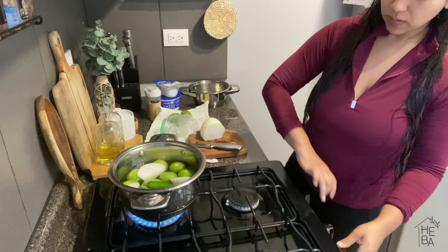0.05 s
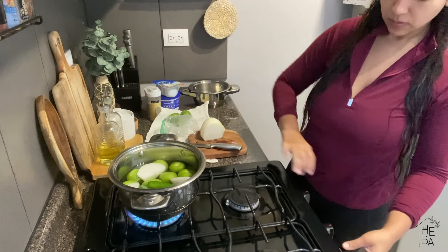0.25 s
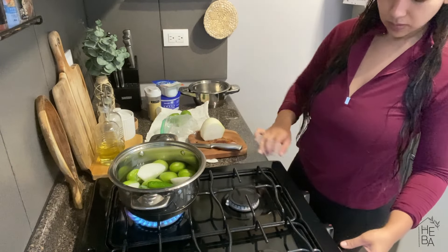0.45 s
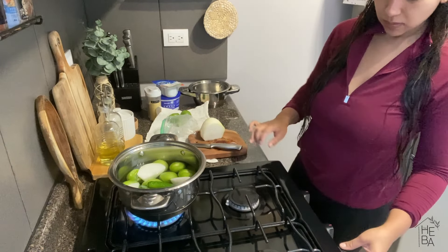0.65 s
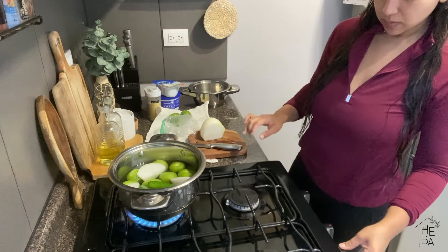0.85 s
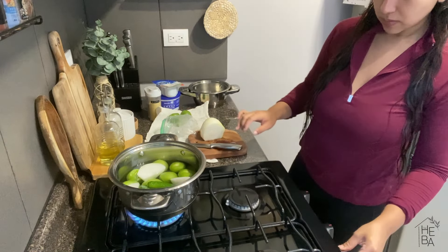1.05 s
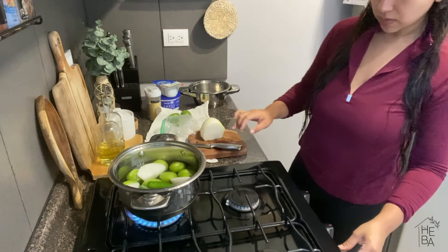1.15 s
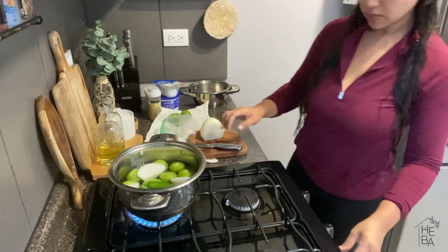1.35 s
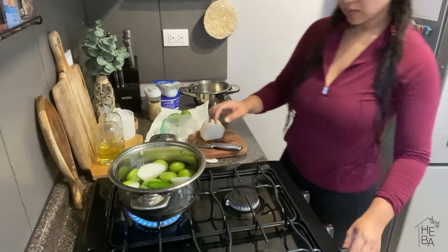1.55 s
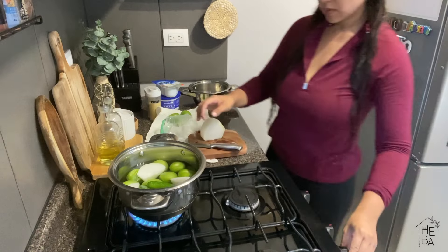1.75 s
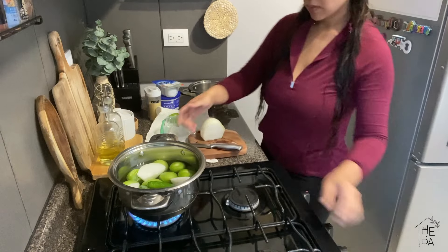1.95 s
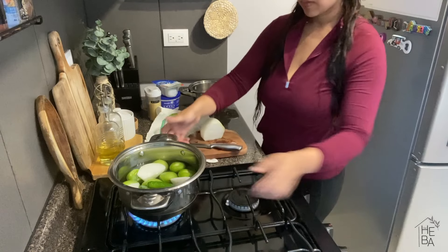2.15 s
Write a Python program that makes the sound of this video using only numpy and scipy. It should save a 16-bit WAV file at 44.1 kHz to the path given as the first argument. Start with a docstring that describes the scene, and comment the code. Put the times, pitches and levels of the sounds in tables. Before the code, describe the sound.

Beside a softly rumbling lit burner, gas hisses, a spark snaps and flame bursts out with a boom and metallic stove ring, fades quickly, then a light knock and dull movement, heard nearby in a reverberant kitchen.

```python
"""Beside a rumbling, already lit burner, gas hisses out (filtered noise) in a small hard-walled kitchen.
A spark snaps, clicks begin (short noise bursts) and the gas catches: a pop, then decaying room and hob modes.
The flame roars and rushes (resonant and fluttering noise), with hob hum and scuffs, then hoots (a sine
and its octave) and settles. Last, a light hob knock (decaying modes), then the cook steps away with
dull shuffling and a rustle of clothes (shaped noise)."""
import sys
import numpy as np
from scipy import signal
from scipy.fft import rfft, irfft, next_fast_len
from scipy.io import wavfile
from scipy.ndimage import uniform_filter1d, map_coordinates

SR = 44100
rng = np.random.default_rng(int(sys.argv[2]) if len(sys.argv) > 2 else 0)


def log_audio(samples):
    """Write samples as a 16-bit WAV file to the path given in sys.argv[1]."""
    # one column per channel
    frames = np.atleast_2d(samples).T
    # limit to full scale, then quantise
    limited = np.clip(frames, -1, 1)
    pcm = np.round(limited * 32767).astype(np.int16)
    wavfile.write(sys.argv[1], SR, pcm)


N = 97020

# stereo likeness of room noise: frequency_hz, left_right_correlation
LIKENESS = [(100, 0.96), (200, 0.76), (370, 0.2), (700, 0.24), (1300, 0.48), (2500, 0.23), (5500, 0.096),
            (8000, 1), (14000, 1)]
# stereo balance: frequency_hz, left_over_right_db
BALANCE = [(60, 2.5), (120, 4.5), (240, 6), (370, -1), (600, 2.5), (2000, 1.3), (9000, 0.5)]
# left channel's delay behind the right: frequency_hz, lag_s
LEFT_LAG = [(100, .00005), (400, .00015), (900, .0003), (5100, .000294), (10400, .00024)]
# colour of the kitchen's lingering answer: frequency_hz, gain_db
ECHO_COLOUR = [(200, -14), (700, -7.5), (1600, 2), (3000, -10), (6000, -33)]
# spectrum of the lit burner: frequency_hz, level_db
RUMBLE_SPECTRUM = [(27, -32), (41, -1), (50, -17.5), (80, -5), (120, -7), (146, -9.5), (180, -9.5),
                   (260, -11.5), (340, -20), (700, -32.5), (2500, -59.5), (8000, -62.5), (14000, -64)]
# low drone of the lit burner: time_s, level_db
DRONE_LEVEL = [(0, -33.5), (0.07, -51), (0.12, -51), (1.08, -45.5), (1.15, -33), (1.22, -43), (1.4, -36.5),
               (1.58, -46), (1.75, -39), (2.2, -35.5)]
# hob's main resonance: time_s, level_db
HUM_LEVEL = [(0.06, -64), (0.13, -44), (0.195, -40), (0.27, -27), (0.45, -31.5), (0.55, -42), (0.68, -33),
             (0.76, -40), (0.84, -66), (1.5, -64.5), (1.8, -47.5), (2.2, -46)]
# unlit gas: time_s, level_db
GAS_LEVEL = [(0, -49), (0.06, -53), (0.095, -39.5), (0.18, -37.5), (0.22, -64)]
# spectrum of the gas jet: frequency_hz, level_db
JET_SPECTRUM = [(150, -20), (280, -6.5), (700, -13.5), (1400, -15), (2600, -19), (5000, -32.5),
                (8300, -36.5), (14000, -57.5)]
# narrow-band scuffs and squeaks: start_s, level_db (before doubling), centre_hz, width_hz
SCUFFS = [(0.336, -32.5, 2520, 330), (1.39, -54, 1770, 120), (1.455, -53, 1720, 100),
          (1.517, -52, 1760, 120), (1.556, -52.5, 1640, 110), (1.606, -57, 1590, 110),
          (1.628, -49, 990, 150), (1.913, -34.5, 646, 300), (2.001, -47, 3260, 1200)]
# cook's movement: time_s, shuffle_db, cloth_db, swish_db
MOVES = [(1.19, -63.5, -96, -94), (1.23, -41, -57, -82), (1.33, -42.5, -66.5, -87), (1.42, -44, -60.5, -80),
         (1.59, -43.5, -59, -86.5), (1.66, -40, -58.5, -68), (1.715, -35.5, -49.5, -80.5),
         (1.76, -38.5, -54, -76.5), (1.81, -38, -52.5, -63), (1.895, -34, -47, -53.5),
         (1.95, -37.5, -54.5, -65), (2.0, -39.5, -57, -57.5), (2.07, -35, -44.5, -62.5),
         (2.125, -30.5, -38, -48), (2.165, -27.5, -44, -51.5), (2.2, -34, -45, -55.5)]
# spectra of the movement: frequency_hz, level_db
SHUFFLE_SPECTRUM = [(24, -53.5), (45, -5), (117, -2.5), (220, -6), (320, -16), (520, -13), (850, -19.5),
                    (1500, -30.5), (3000, -68)]
CLOTH_SPECTRUM = [(500, -18), (900, -2), (1700, -0.5), (3500, -11.5), (5400, -24), (12000, -36.5)]
SWISH_SPECTRUM = [(1500, -16), (3500, 4.5), (6000, -0.5), (8500, 1), (14500, -7.5)]
# hob modes under a light knock: frequency_hz, level_db, t60_s
KNOCK_MODES = [(259, -8.5, 0.18), (369, -2.5, 0.44), (1061, -13, .32), (1108, -6, 0.2), (2067, -17.5, 0.19),
               (2440, -20, .2)]
# clicks of knob and hob: start_s, level_db, brightness_db
CLICKS = [(0.194, -31, 10), (0.241, -32, 9.5), (0.33, -32.5, 15), (0.335, -32, 12.5), (0.432, -37, -14),
          (0.477, -37, 0.5), (0.514, -37, -1), (0.611, -43, -6), (0.639, -35.5, -1.5), (1.203, -50.5, -13),
          (1.452, -52, -3.5), (1.626, -61, 10), (1.697, -45.5, -25), (1.774, -52.5, -9.5), (1.818, -49, -4),
          (2.001, -48.5, -7)]
# spectrum of clicks and spark: frequency_hz, level_db
CLICK_SPECTRUM = [(200, -17), (500, -8), (1100, 5.5), (2700, 3.5), (5000, -4), (8500, -7), (14000, -21)]
# flame's hoot: time_s, pitch_hz, level_db
HOOT_TRACK = [(0.53, 112, -43), (0.58, 113.4, -22), (0.67, 109.3, -33), (0.70, 113.5, -20.5),
              (0.745, 111.8, -17), (0.80, 114.5, -20), (0.85, 119, -28.5), (0.93, 117, -60)]
# surges of the flame: start_s, boom_db, hob_db (both before doubling)
SURGES = [(0.194, -20, -3.5), (0.222, -8, -35.5), (0.316, -26, -9), (0.386, -12, -31.5), (0.49, -18, -31)]
# modes set ringing by a surge: frequency_hz, level_db, t60_s
BOOM_MODES = [(87.1, 1, 0.22), (122, -14, 0.59)]
HOB_MODES = [(371.1, -0.5, .25), (449.8, -21.5, 0.47), (609, -13, 0.18), (800, -22.5, 0.18),
             (879, -15.5, 0.17), (1061, -27.5, 0.25)]
# resonances colouring roar and shuffling: centre_hz, width_hz, level_db
CAVITY_MODES = [(82, 16.6, -3), (121, 11.3, 2), (180.9, 10.9, -2.5), (219.7, 6, -5), (265.5, 15.2, -7.5),
                (360.7, 20, -7.5), (458.6, 16.4, -8), (577, 33, -15.5), (609, 10.3, -10.5),
                (792, 6.6, -12.5), (900, 9.3, -19.5), (1035, 25, -19), (1836, 12, -27.5), (2500, 28, -29)]
# flame: time_s, roar_db, rush_db
FLAME_LEVELS = [(0.19, -40, -24.5), (0.225, -18.5, -24.5), (0.26, -17.5, -25.5), (0.30, -16, -27.5),
                (0.365, -13, -31), (0.44, -19, -31.5), (0.51, -21.5, -31.5), (0.595, -31.5, -39),
                (0.66, -25.5, -34), (0.72, -31.5, -44), (0.79, -38, -53), (0.87, -42.5, -60.5),
                (0.97, -57, -76.5), (1.12, -58, -86)]
# spectrum of the flame's rush: frequency_hz, level_db
RUSH_SPECTRUM = [(260, -40), (480, -3), (850, -9), (1400, -18), (2600, -19.5), (5000, -30), (8000, -37),
                 (11000, -39.5), (14000, -44), (15000, -47.5)]

TOP_HZ = 15100
RIPPLE_DB, RIPPLE_STEP_HZ = 2.76, 45
ECHO_DB, ECHO_RISE_S, ECHO_T60_S = -8, 0.0054, 0.82
RUMBLE_DB, DRONE_HZ, DRONE_SWING_DB = -42.5, 117.9, -0.5
WHINE_HZ, WHINE_WIDTH_HZ, WHINE_DB = 13560, 200, -78
HOB_HZ, HUM_SWING_DB = 371.5, 1.7
SCUFF_RISE_S, SCUFF_T60_S = 0.0098, 0.13
KNOCK_S, KNOCK_DB = 1.203, -35.5
CLICK_RISE_S, CLICK_T60_S, CLICK_SPLIT_HZ = 0.003, 0.26, 2800
HOOT_OCTAVE_DB = -26
SPARK_S, SPARK_DB, SPARK_RISE_S, SPARK_T60_S = 0.1918, -26, 0.0002, 0.014
IGNITION_S = 0.191
POP_DB, POP_HZ, POP_WIDTH_HZ, POP_RISE_S, POP_T60_S = -16, 703, 330, 0.0019, 0.12
BOOM_RISE_S, HOB_RISE_S, HOB_PAN_DB = 0.016, 0.021, -5


def amp(db):
    """Amplitude gain of a level in dB."""
    return 10 ** (np.asarray(db) / 20)


def unit(x):
    """x scaled to rms 1."""
    return x / np.sqrt(np.mean(x ** 2) + 1e-20)


def along(points, hz):
    """Value at hz from (frequency_hz, value) points on a log axis."""
    f, v = np.transpose(points)
    return np.interp(np.log(hz + 1), np.log(f + 1), v)


def curves(rows):
    """One value per sample for each column after the time."""
    s, *cols = np.transpose(rows)
    return [np.interp(np.arange(N) / SR, s, c) for c in cols]


def wobble(rate_hz):
    """Smooth random curve with rate_hz knots a second."""
    knots = rng.standard_normal(int(N * rate_hz / SR) + 4)
    return map_coordinates(knots, [np.arange(N) * rate_hz / SR])


def filtered(x, response):
    """x times a response of frequency, padded against wrap-around."""
    m = next_fast_len(N + SR // 2)
    return irfft(rfft(x, m) * response(np.fft.rfftfreq(m, 1 / SR)), m)[..., :N]


def pan(db):
    """Left and right gains for a left-over-right difference."""
    return amp(np.array([[0.5], [-0.5]]) * db)


def noise(colour):
    """Stereo room noise of rms 1; colour gives the gain at each frequency."""
    def mid_side(hz):
        turn = np.arccos(np.clip(along(LIKENESS, hz), -1, 1)) / 2
        return colour(hz) * np.array([np.cos(turn), np.sin(turn)])

    mid, side = filtered(rng.standard_normal((2, N)), mid_side)
    stereo = np.array([mid + side, mid - side])
    return unit(filtered(stereo, lambda hz: pan(along(BALANCE, hz))))


def hiss(spectrum):
    """Room noise with a spectrum rippled by wall reflections, less so below 1 kHz."""
    knots = rng.standard_normal(2000)

    def colour(hz):
        ripple = map_coordinates(knots, [hz / RIPPLE_STEP_HZ], mode="wrap")
        return amp(along(spectrum, hz) + RIPPLE_DB * np.minimum(hz / 1000, 1) * ripple)

    return noise(colour)


def resonant(peaks):
    """Room noise through parallel second-order resonances of alternating sign."""
    def colour(f):
        total = 0
        for k, (centre, width, db) in enumerate(peaks):
            damping = 1j * f * width
            total = total + (-1) ** k * amp(db) * damping / (centre * centre - f * f + damping)
        return total

    return noise(colour)


def band(centre_hz, width_hz):
    """Room noise around one frequency."""
    return noise(lambda hz: 1 / (1 + (2 * (hz - centre_hz) / width_hz) ** 2))


def steady(x, size):
    """x with its slow swells evened out over size samples."""
    power = uniform_filter1d(np.mean(x ** 2, axis=0), size)
    return x / np.sqrt(np.abs(power) + 1e-9)


def struck(start_s, rise_s, t60_s):
    """Envelope that rises from start_s and decays exponentially."""
    t = np.maximum(np.arange(N) / SR - start_s, 0)
    return (1 - np.exp(-t / rise_s)) * 1000 ** (-t / t60_s)


def ring(start_s, modes, rise_s, rough_rad=0.3):
    """Decaying sine modes; phase wavers in proportion to frequency, rough_rad at HOB_HZ."""
    t = np.arange(N) / SR - start_s
    out = np.zeros(N)
    for hz, db, t60_s in modes:
        phase = 2 * np.pi * hz * t + rough_rad * hz / HOB_HZ * wobble(60.2)
        out += amp(db) * struck(start_s, rise_s, t60_s) * np.sin(phase)
    return out


def background():
    """Lit burner: noise rumble, a wavering low drone and a faint narrow-band whine."""
    db, = curves(DRONE_LEVEL)
    phase = 2 * np.pi * DRONE_HZ * np.arange(N) / SR + 0.86 * wobble(9)
    drone = amp(db + DRONE_SWING_DB * wobble(10.17)) * unit(np.sin(phase)) * pan(along(BALANCE, DRONE_HZ))
    rumble = amp(RUMBLE_DB) * hiss(RUMBLE_SPECTRUM)
    whine = amp(WHINE_DB) * resonant([(WHINE_HZ, WHINE_WIDTH_HZ, 0)])
    return drone + rumble + whine


def hum():
    """Hob's main resonance: a hollow sine, unsteady in phase and level."""
    db, = curves(HUM_LEVEL)
    phase = 2 * np.pi * HOB_HZ * np.arange(N) / SR + 0.59 * wobble(24.4)
    return amp(db + HUM_SWING_DB * wobble(30.0)) * unit(np.sin(phase)) * pan(along(BALANCE, HOB_HZ))


def scuffs():
    """Brief rubs and squeaks, each in one narrow band."""
    out = np.zeros((2, N))
    for start_s, db, centre_hz, width_hz in SCUFFS:
        rub = steady(band(centre_hz, width_hz), size=900)
        out += amp(db) * struck(start_s, SCUFF_RISE_S, SCUFF_T60_S) * rub
    return 2 * out


def cook(grain_db=1.4, flutter_db=1.1, room_db=-4):
    """Dull shuffling that stirs the room's resonances, and grainy rubbing of cloth."""
    shuffle_db, cloth_db, swish_db = curves(MOVES)
    shuffle = unit(hiss(SHUFFLE_SPECTRUM) + amp(room_db) * resonant(CAVITY_MODES))
    grain = amp(flutter_db * wobble(30.15) + grain_db * wobble(300))
    rubbing = amp(cloth_db) * hiss(CLOTH_SPECTRUM) + amp(swish_db) * hiss(SWISH_SPECTRUM)
    return amp(shuffle_db) * shuffle + grain * rubbing


def knock():
    """Light knock as the hand shifts on the hob's edge: modes waver separately per channel."""
    return amp(KNOCK_DB) * np.array([ring(KNOCK_S, KNOCK_MODES, CLICK_RISE_S) for channel in range(2)])


def clicks():
    """Knob and hob clicks: decaying noise bursts, tilted in treble by their brightness."""
    out = np.zeros((2, N))
    for start_s, db, bright_db in CLICKS:
        def colour(hz):
            treble = hz ** 2 / (hz ** 2 + CLICK_SPLIT_HZ ** 2)
            return amp(along(CLICK_SPECTRUM, hz) + bright_db * treble)

        out += amp(db) * struck(start_s, CLICK_RISE_S, CLICK_T60_S) * noise(colour)
    return out


def gas():
    """Unlit gas jet: noise with an unsteady level."""
    db, = curves(GAS_LEVEL)
    return amp(db + wobble(50)) * hiss(JET_SPECTRUM)


def spark():
    """Igniter's snap: a very short, bright noise burst."""
    return amp(SPARK_DB) * struck(SPARK_S, SPARK_RISE_S, SPARK_T60_S) * hiss(CLICK_SPECTRUM)


def hoot():
    """Settling flame sings one low note with a faint octave."""
    hz, db = curves(HOOT_TRACK)
    phase = 2 * np.pi * np.cumsum(hz) / SR
    tone = np.sin(phase) + amp(HOOT_OCTAVE_DB) * np.sin(2 * phase)
    return amp(db) * np.sqrt(2) * tone * pan(along(BALANCE, hz))


def whump():
    """Gas catches with a dull pop; each surge of flame booms in the room and rings the hob."""
    pop = amp(POP_DB) * struck(IGNITION_S, POP_RISE_S, POP_T60_S) * band(POP_HZ, POP_WIDTH_HZ)
    boom = sum(amp(db) * ring(s, BOOM_MODES, BOOM_RISE_S) for s, db, _ in SURGES)
    hob = sum(amp(db) * ring(s, HOB_MODES, HOB_RISE_S) for s, _, db in SURGES)
    boom_pan_db = along(BALANCE, BOOM_MODES[0][0])
    return pop + 2 * (boom * pan(boom_pan_db) + hob * pan(HOB_PAN_DB))


def flame(flutter_db=2.0, crackle_db=1.56, rise_s=0.0023):
    """Turbulent burning from ignition: a roar in the hob's resonances under a fluttering rush."""
    roar_db, rush_db = curves(FLAME_LEVELS)
    alight = 1 - np.exp(-np.maximum(np.arange(N) / SR - IGNITION_S, 0) / rise_s)
    roar = amp(roar_db) * steady(resonant(CAVITY_MODES), size=3000)
    flutter = flutter_db * wobble(44.6) + crackle_db * wobble(400)
    rush = amp(rush_db + flutter) * hiss(RUSH_SPECTRUM)
    return alight * (roar + rush)


def echo(x):
    """Hard walls hold on to the middle range: convolution with one second of decaying noise."""
    tail = (struck(0, ECHO_RISE_S, ECHO_T60_S) * rng.standard_normal((2, N)))[:, :SR]
    wet = signal.fftconvolve(x, tail / np.linalg.norm(tail[0]), axes=1)[:, :N]
    return amp(ECHO_DB) * filtered(wet, lambda hz: amp(along(ECHO_COLOUR, hz)))


def scene():
    """Sum of all sources; only flame and clicks feed the echo."""
    fire = flame() + clicks()
    surroundings = background() + hum() + scuffs() + cook() + knock()
    return surroundings + gas() + spark() + hoot() + whump() + fire + echo(fire)


def record(dry):
    """Round the peaks, cut the top and delay left against right."""
    rounded = dry / (1 + np.abs(dry) ** 8) ** (1 / 8)

    def response(hz):
        # half the lag on each side
        half_lag_rad = np.pi * hz * along(LEFT_LAG, hz)
        return (hz < TOP_HZ) * np.exp(1j * half_lag_rad * np.array([[-1], [1]]))

    return filtered(rounded, response)


dry = scene()
out = record(dry)
log_audio(out)
```